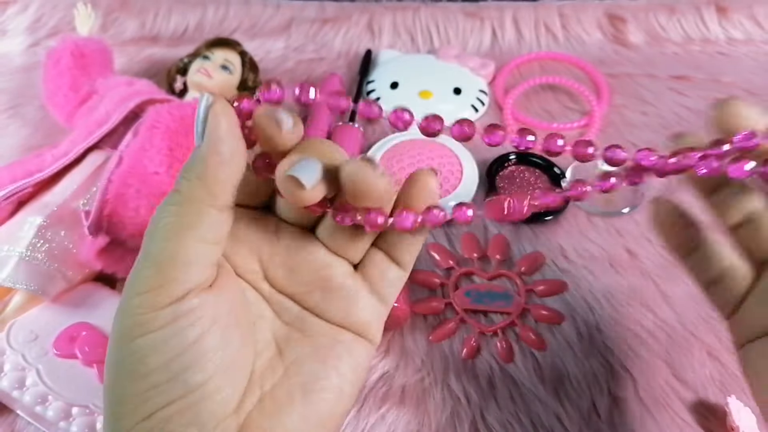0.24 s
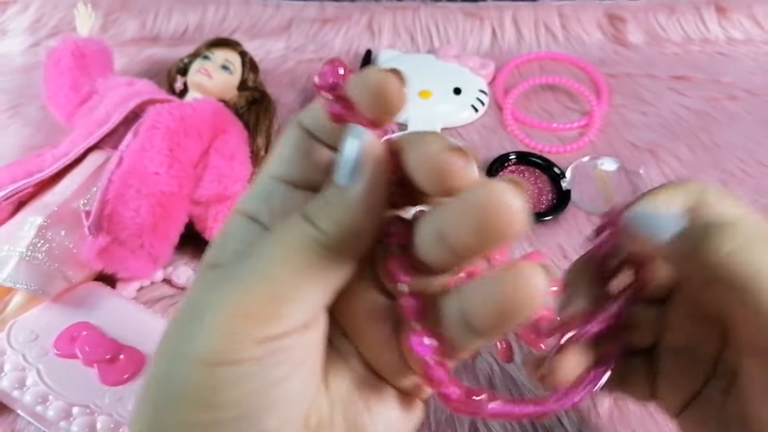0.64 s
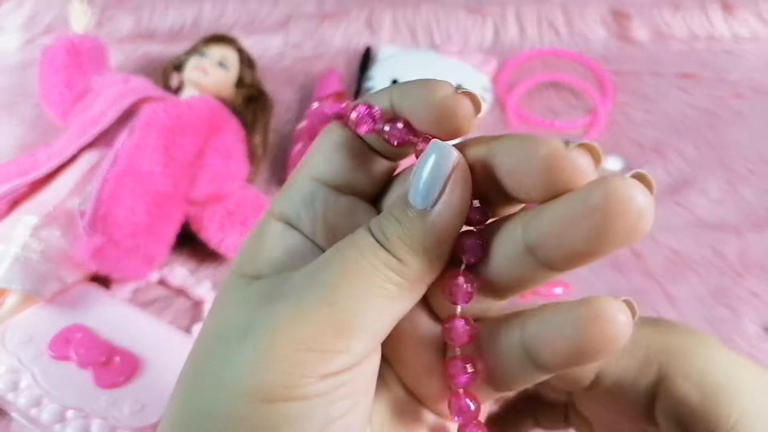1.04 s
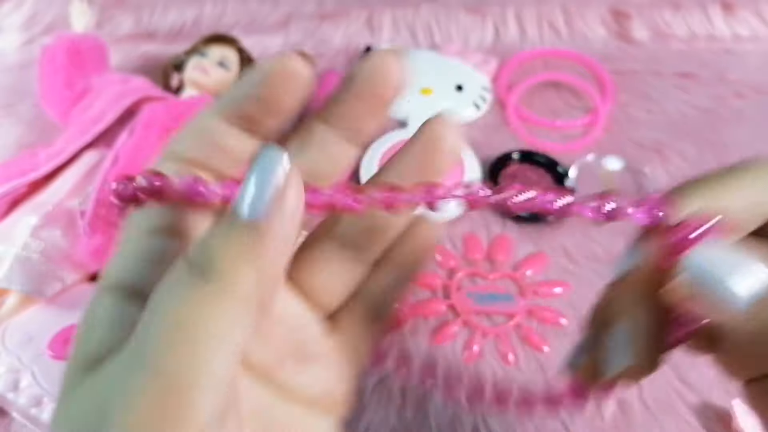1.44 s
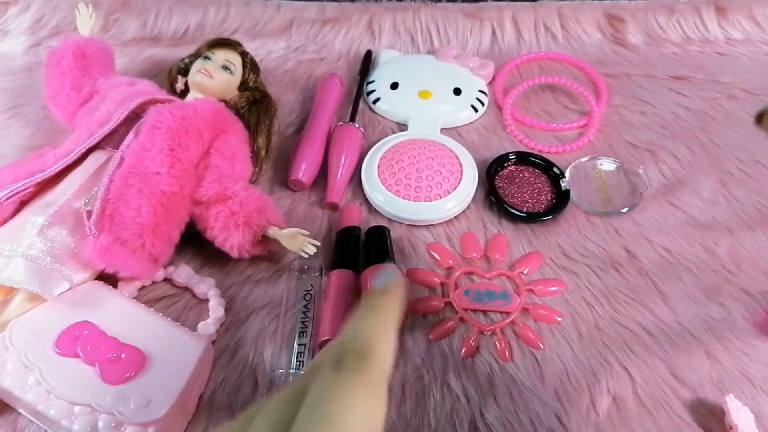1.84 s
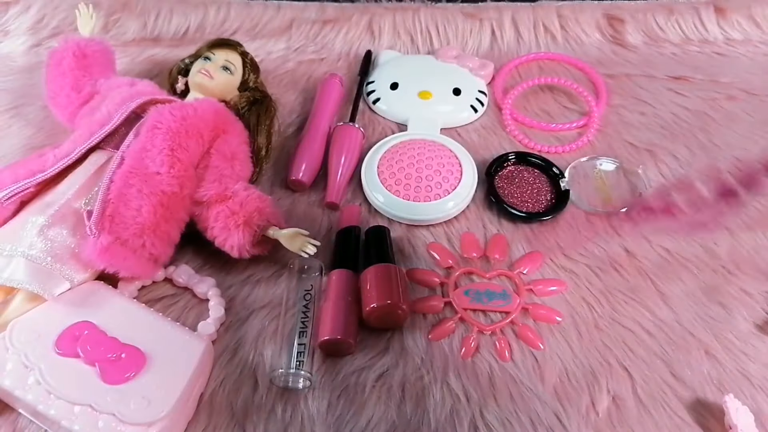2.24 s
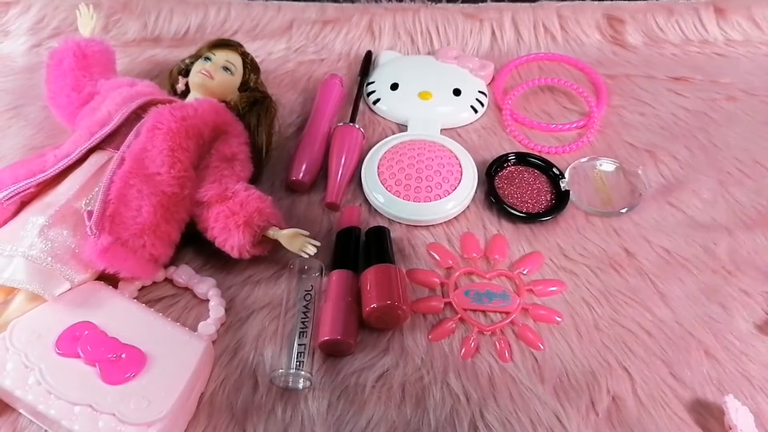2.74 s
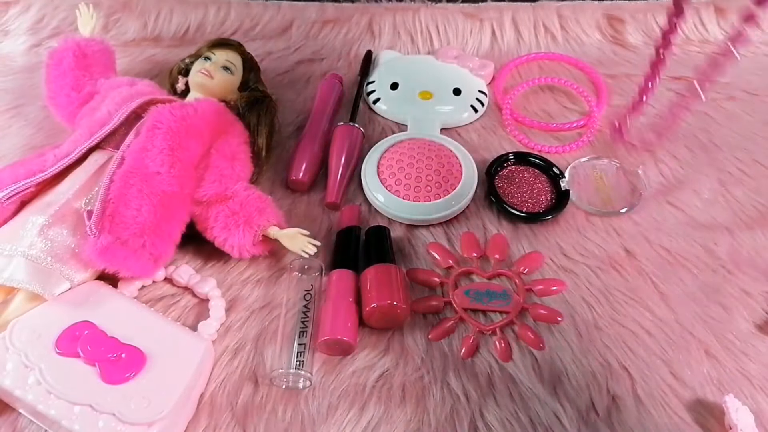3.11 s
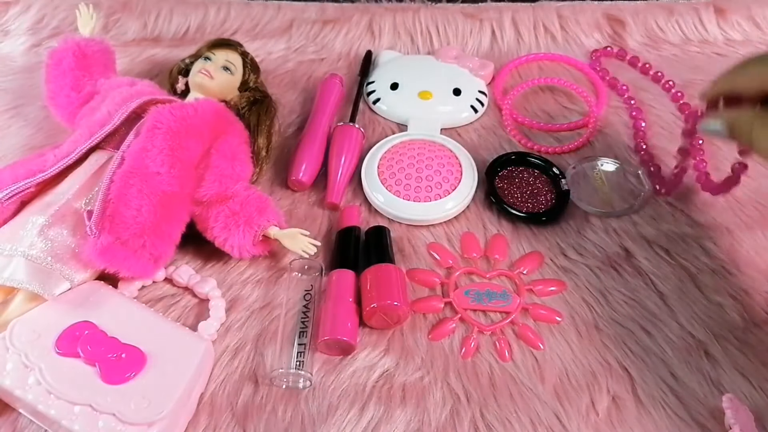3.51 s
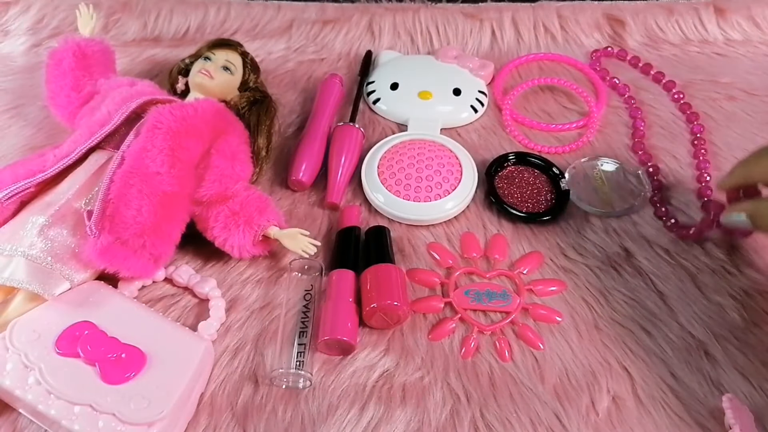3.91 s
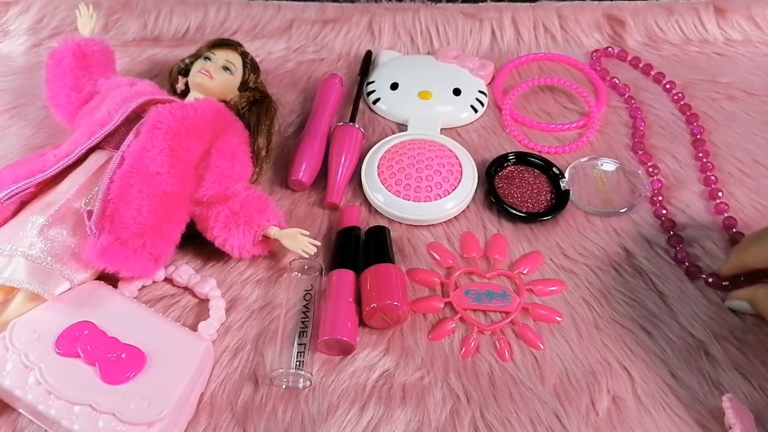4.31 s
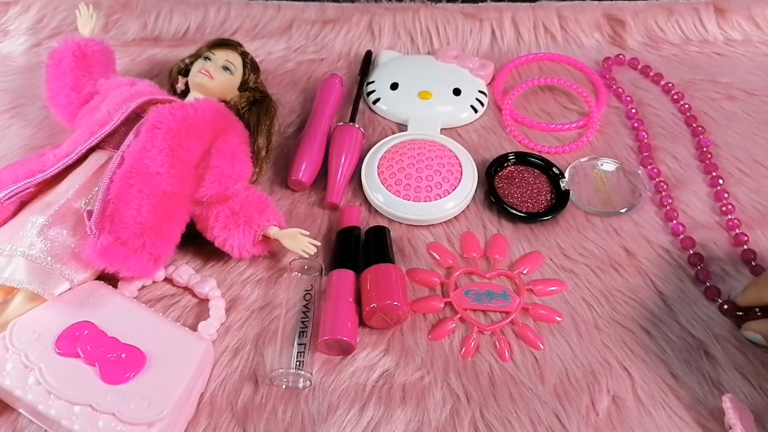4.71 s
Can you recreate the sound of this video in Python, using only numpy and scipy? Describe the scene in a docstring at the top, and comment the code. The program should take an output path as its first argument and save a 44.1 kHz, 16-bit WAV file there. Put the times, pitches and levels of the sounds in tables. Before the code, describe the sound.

Close, delicate handling of a plastic bead necklace over a fur rug. Crisp tiny clicks come in clusters, pause, and return as a rapid rattle on the right. A muffled puff and thud follow, then two short, bright, hollow clinks about half a second apart. Soft rubbing fades out at the end. Small soft-furnished room, short tail, uneven low motor hum and steady faint hiss.

```python
"""A string of hard plastic beads is turned in the hands near a two-port microphone, over a low hum and hiss.
First beads tick on each other as skin and fur rub, one knocks a dull toy, and a flurry of ticks follows.
Then soft drops land on a fur rug, a small hollow toy is struck twice, and rustle continues to the end.
Contacts are band-limited clicks, toys are sums of damped sines, and rubs, drops, hum and hiss are shaped noise.
A small room answers the ticks and toys with scatter, a few echoes and a short tail."""
import sys
import numpy as np
from scipy import signal
from scipy.fft import rfft, irfft
from scipy.io import wavfile

SR = 44100
rng = np.random.default_rng(int(sys.argv[2]) if len(sys.argv) > 2 else 0)


def put_to_file(sound):
    """Save the sound as 16-bit audio at rate SR, in the file named by the first command-line argument."""
    columns = np.atleast_2d(sound).T  # one column per channel
    safe = np.clip(columns, -1, 1)
    whole_steps = np.round(safe * 32767)
    wavfile.write(sys.argv[1], SR, whole_steps.astype(np.int16))


N = 218769


def amp(db):
    """Level law: an amplitude ratio is ten to the power of dB / 20."""
    return 10 ** (np.asarray(db) / 20)


def in_time(rows):
    """Linear interpolation: each column of a time curve is read at every sample."""
    s, *columns = np.transpose(rows)
    t = np.arange(N) / SR
    return [np.interp(t, s, column) for column in columns]


def band(x, low_hz, high_hz):
    """Band-pass filtering: gentle Butterworth slopes keep one range of frequency."""
    sos = signal.butter(2, [low_hz, min(high_hz, .45 * SR)], "band", fs=SR, output="sos")
    return signal.sosfilt(sos, x + 1e-18)


def train(seconds, db, pan_db, left_lag=0):
    """Interaural cues: clicks differ in level and arrival (lag in samples); rows are left, right, room feed."""
    clicks = np.zeros((3, N))
    at = np.round(np.asarray(seconds) * SR).astype(int)
    np.add.at(clicks[0], at + left_lag, amp(db + pan_db / 2))
    np.add.at(clicks[1], at, amp(db - pan_db / 2))
    np.add.at(clicks[2], at, amp(db))
    return clicks


def ring(clicks, hz, t60):
    """Damped resonance: a unit click starts a decaying sine of initial height 1."""
    r = amp(-60 / (t60 * SR))
    w = 2 * np.pi * hz / SR
    return signal.lfilter([0, np.sin(w)], [1, -2 * r * np.cos(w), r * r], clicks + 1e-18)


def strike(blow, modes):
    """Modal superposition: a blow excites every mode, neighbours starting in opposite sense."""
    total = 0
    for k, (hz, db, t60) in enumerate(modes):
        total = total + (-1) ** k * amp(db) * ring(blow, hz, t60)
    return total


def crack(clicks, low_hz, high_hz):
    """Impulse response: a unit click becomes a short band-limited pulse of height about 1."""
    pulse = band(band(clicks, low_hz, high_hz), low_hz, high_hz)
    return pulse * SR / (2 * (high_hz - low_hz))


# Left-right correlation of diffuse noise: f/Hz, likeness (1 = equal, 0 = unrelated)
LIKENESS_CURVE = [(60, 0.37), (180, 0.93), (550, 0.22), (1650, 0.0082), (4970, -0.13), (15000, -0.016)]


def noise(colour):
    """Spatial coherence: mid and side noise mix to a left-right likeness set by frequency; overall rms 1."""
    log_hz = np.log(np.arange(N // 2 + 1) * SR / N + 1)

    def at_bins(points):
        hz, value = np.transpose(points)
        return np.interp(log_hz, np.log(hz), value)

    mid, side = rfft(rng.standard_normal((2, N)))
    alike = np.clip(at_bins(LIKENESS_CURVE), -1, 1)
    pair = np.sqrt(1 + alike) * mid + np.sqrt(1 - alike) * side * [[1], [-1]]
    out = irfft(amp(at_bins(colour)) * pair, N)
    return out / out.std()


# Uneven level of the low random hum, before the small left-right offset: t/s, level/dB
HUM_LEVEL = [(0.0, -59.5), (0.5, -60), (0.9, -56.5), (1.73, -57), (2.33, -62), (2.9, -55), (3.35, -60.5),
             (4.05, -55.5), (4.96, -56.5)]
# Relative spectral density of the hum: f/Hz, level/dB per Hz
HUM_SPECTRUM = [(15, -39), (25, -1.5), (70, -9.5), (136, -7.5), (189, -11), (232, -1.5), (266, -8.5),
                (305, -4), (327, -20), (356, -11.5), (388, -20.5), (718, -16), (1080, -33), (1500, -41),
                (1950, -51), (3300, -120)]


def hum():
    """Amplitude modulation: low coloured noise follows an uneven level curve."""
    level_db, = in_time(HUM_LEVEL)
    return amp(level_db) * noise(HUM_SPECTRUM) * amp([[-.6], [.6]])


# Motor lines, level about which each wavers: f/Hz, level/dB rms
MOTOR_LINES = [(37, -70.5), (239, -69.5), (302, -72)]


def tones():
    """Line spectrum: steady motor pitches waver slowly in strength."""
    t = np.arange(N) / SR
    phases = rng.uniform(0, 2 * np.pi, (len(MOTOR_LINES), 2))
    total = 0
    for (hz, db), (phase, waver_phase) in zip(MOTOR_LINES, phases):
        waver_db = 6.1 * np.sin(6.23 * t + waver_phase)     # about once a second
        total = total + np.sqrt(2) * amp(db + waver_db) * np.sin(2 * np.pi * hz * t + phase)
    return total


# Relative spectral density of the hiss: f/Hz, level/dB per Hz
HISS_SPECTRUM = [(500, 1), (1200, -1), (3100, -5.5), (3950, -17), (5000, -9.5), (7100, -23.5),
                 (9000, -22.5), (12000, -16.5), (15200, -19.5), (15750, -20.5), (16000, -66)]


def hiss():
    """Stationary random noise: a constant, broad hiss lies under everything."""
    return amp(-68.5) * noise(HISS_SPECTRUM) * amp([[-.7], [.7]])


# How busily the fingers work the string, as level of the fine rustle: t/s, level/dB
HANDLING_LEVEL = [(0, -82.5), (.27, -85), (.7, -85), (1.0, -80.5), (1.35, -89), (1.7, -78), (2.3, -88.5),
                  (2.63, -81), (2.9, -85), (3.5, -85), (3.58, -81), (3.68, -91.5), (4.1, -82.5), (4.4, -81),
                  (4.96, -89)]
# Heavier rubs of skin and fur: t/s, length/s, middle layer level/dB, coarse layer level/dB
RUB_EVENTS = [(.225, .09, -67, -90), (0.452, 0.096, -61, -59), (0.538, 0.059, -70, -69),
              (1.444, 0.57, -83, -78), (2.603, 0.055, -69.5, -78), (2.655, 0.096, -67, -78),
              (3.548, 0.11, -88, -73), (4.044, 0.13, -70.5, -66), (4.158, 0.15, -77.5, -67.5),
              (4.254, 0.67, -86, -74), (4.744, 0.11, -79, -75)]


def rustle():
    """Friction noise: uneven grains form a fine layer that follows the handling, and rubs that swell fast."""
    t = np.arange(N) / SR
    rub_gains = np.zeros((2, 1, N))
    for s, length, *layer_db in RUB_EVENTS:
        part = np.clip((t - s) / length, 0, 1)
        rub_gains += amp(layer_db)[:, None, None] * np.sin(np.pi * part ** 0.5)
    sizes = amp(2.2 * rng.exponential(1, (2, N)))
    present = rng.random((2, N)) < 8000 / SR      # 8000 grains a second on average
    grains = rng.standard_normal((2, N)) * sizes * present
    fine, middle, coarse = band(grains, 4500, 9800), band(grains, 4530, 6050), band(grains, 660, 3800)
    gains = [amp(in_time(HANDLING_LEVEL)[0]), *rub_gains]
    total = sum(gain * layer / layer.std() for gain, layer in zip(gains, [fine, middle, coarse]))
    return total * amp([[-1.5], [1.5]])


# Hand jolts to the stand: t/s, nominal level/dB, upper band edge f/Hz
STAND_JOLTS = [(.456, -46.5, 750), (1.471, -54, 895), (1.476, -49, 910), (1.479, -36, 295),
               (2.735, -44, 72.4), (2.768, -47, 69)]


def bumps():
    """Structure-borne sound: a jolt through the stand is one low, round push on both ports."""
    out = np.zeros(N)
    for s, db, dull_hz in STAND_JOLTS:
        push = band(train([s], db, 0)[2], dull_hz / 3.5, dull_hz)
        out += push * SR / (2.5 * dull_hz)      # offsets the height lost in the band-pass
    return out * amp([[-1.5], [1.5]])


# Soft drops on the rug, before swell and clumping: t/s, puff level/dB, thud level/dB
RUG_DROPS = [(2.97, -47.5, -63), (2.9765, -37, -46), (3.0359, -42, -40.5)]
# Relative spectral density of the puff: f/Hz, level/dB per Hz
PUFF_SPECTRUM = [(60, -14), (130, -0.5), (300, -7), (900, 0), (1500, -15), (3000, -11), (6000, -19),
                 (7200, -19), (9000, -25), (11500, -28.5), (15000, -42), (15600, -46), (15900, -77.5)]
# Relative spectral density of the thud: f/Hz, level/dB per Hz
THUD_SPECTRUM = [(50, -27), (100, -10.5), (200, 7), (330, 1.5), (500, -35)]
LAND_RISE_S, LAND_T60_S = 0.0013, 0.058
# The rest of the weight sinks in a little later
SETTLE_AFTER_S, SETTLE_DB, SETTLE_RISE_S, SETTLE_T60_S = 0.0095, -2.5, 0.0047, 0.21


def drops():
    """Inelastic impact: pile crushed by many small contacts gives a puff of noise and a thud that die away."""
    t = np.arange(N) / SR

    def fade(s, rise, t60):
        since = np.maximum(t - s, 0)
        return amp(-60 * since / t60) * (1 - np.exp(-since / rise))

    puff, thud = 0, 0
    for s, db, thud_db in RUG_DROPS:
        landing = fade(s, LAND_RISE_S, LAND_T60_S)
        settling = amp(SETTLE_DB) * fade(s + SETTLE_AFTER_S, SETTLE_RISE_S, SETTLE_T60_S)
        puff = puff + amp(db) * (landing + settling)
        thud = thud + amp(thud_db) * (landing + settling)
    lumps = band(rng.standard_normal(N), 40, 420)      # the contacts come in clumps
    puff = puff * amp(1.6 * lumps / lumps.std())
    low_pass = signal.butter(12, 15300, fs=SR, output="sos")
    crush = signal.sosfilt(low_pass, puff * noise(PUFF_SPECTRUM))
    return (crush + thud * noise(THUD_SPECTRUM)) * amp([[-2.5], [2.5]])


# Rate at mean handling in 1/s; greatest level, sharpness and mean left minus right in dB
FAINT_PER_S, FAINT_DB, FAINT_SHARP_DB, FAINT_PAN_DB = 5.3, -64.5, -16, -13


def faint_ticks():
    """Random point process: small chance contacts are more frequent while the fingers are busy."""
    busy_db, = in_time(HANDLING_LEVEL)
    chance = rng.random((N // 441, 4))      # one try every hundredth of a second
    at = np.arange(len(chance)) * 441
    hit = chance[:, 0] < FAINT_PER_S / 100 * amp(busy_db[at] - busy_db.mean())
    s = (at + 400 * chance[:, 1]) / SR
    db = FAINT_DB - 8.0 * chance[:, 2]
    sharp_db = FAINT_SHARP_DB + 0 * at
    pan_db = FAINT_PAN_DB + 12.0 * (chance[:, 3] - .5)
    return np.c_[s, db, sharp_db, pan_db], hit


# Clear bead contacts: t/s, body band level/dB, sharpness (top band re body)/dB, left minus right/dB
BEAD_TICKS = [(0.126, -66, -5, -19), (0.159, -61, -24, -15), (0.2292, -37, 6.5, -3),
              (0.2347, -42.5, 7, -14), (0.2389, -46.5, 0, -18), (0.2544, -52, 13, -15),
              (0.2845, -48, 3, -21.5), (0.2887, -53, -1, -7), (0.2965, -58, -15, -16),
              (0.3681, -52.5, 0, -24), (0.4767, -43, -2, -24), (0.5055, -51, 1.5, -32),
              (0.5346, -51, 6, -19), (0.5661, -51, -2.5, -34), (1.0122, -52.5, -3, -12),
              (1.0989, -59.5, -10, -12), (1.1088, -63, -4, -23), (1.4678, -59, -14, -7),
              (1.511, -47.5, -28, 18.5), (1.5419, -49.5, -9, 14), (1.6591, -49.5, -20, -10),
              (1.6654, -57.5, -5, -32.5), (1.858, -54.5, -3, -16), (1.967, -60.5, -4, -24),
              (1.978, -32, -0.5, -18), (2.1746, -43, 10.5, -17), (2.202, -46, 2, -11),
              (2.2165, -49.5, 6, -24), (2.2246, -63, -4, -25), (2.238, -55, 1, -23), (2.2536, -46, 3, -25),
              (2.2772, -47, 2, -15), (2.291, -53, -7, -17), (2.313, -43, 0, -10), (2.3166, -44, -2, -18.5),
              (2.3214, -49, -1, -14), (2.334, -47, 0, -19), (2.339, -44.5, 7.5, -18), (2.3674, -52, 8, -8),
              (2.4213, -41, 6, -22), (2.4308, -51, 1, -27), (2.4343, -50, 5, -30), (2.4512, -58, 3, -22),
              (2.558, -59, -19, -7), (2.568, -56, -23, -10), (2.82, -49.5, -19, -20.5),
              (3.4485, -57, -8, -17), (3.5603, -45.5, -10, -15.5), (3.8199, -65.5, -8, -19)]
CHATTER_S, CHATTER_DB = 0.002, -3.5     # longest delay and greatest level of neighbours re first contact
LOW_BAND_DB, LOW_PER_SHARPNESS = -15, -0.9   # low band: dB re body, dB per dB of sharpness


def ticks():
    """Hertzian contact: tiny solid spheres hardly ring, so each touch is a very short click, weak in the lows."""
    faint, hit = faint_ticks()
    events = np.r_[BEAD_TICKS, faint]
    heard = np.repeat(np.r_[np.ones(len(BEAD_TICKS), bool), hit], 4)
    # the jolt runs along the string: three neighbours follow
    late = (rng.random((len(events), 4)) * [0, 1, 1, 1]).ravel()[heard]
    s, db, top_db, pan_db = np.repeat(events, 4, axis=0)[heard].T
    s = s + CHATTER_S * late
    db = db + (late > 0) * CHATTER_DB - 10.0 * late      # later neighbours are weaker
    low_db = np.minimum(LOW_BAND_DB + LOW_PER_SHARPNESS * top_db, -4.0)
    body = crack(train(s, db, pan_db, left_lag=4), 5400, 9200)
    top = crack(train(s, db + top_db, pan_db, left_lag=4), 8020, 15350)
    low = crack(train(s, db + low_db, pan_db, left_lag=4), 2730, 6000)
    return body + top + low


# Beads on the hollow toy: t/s, blow level/dB, cavity f/Hz, left minus right/dB, bright mode gain/dB
HOLLOW_HITS = [(3.2688, -21.5, 4990, -10.5, -24), (3.6522, -22.5, 4810, -7, -39)]
# Shell modes of the hollow toy: f/Hz, level/dB, T60/s
HOLLOW_MODES = [(1440, -19, 0.013), (2800, -17, 0.046), (3280, -12, 0.0095), (3350, -12, 0.016),
                (4450, -40, 0.0096), (6700, -35, 0.0024), (7460, -21.5, 0.0022), (8100, -5, 0.035),
                (8220, -10, 0.014)]
# Modes reached by a sharp blow only, before the gain of each hit: f/Hz, level/dB, T60/s
SHARP_MODES = [(9200, 8, 0.011), (10030, 0, .01), (12500, 10.5, 0.0031), (15000, -14, .004)]
# Bead on the duller toy: t/s, blow level/dB, left minus right/dB
DULL_HITS = [(1.2600, -31.5, -5)]
# Modes of the duller toy: f/Hz, level/dB, T60/s
DULL_MODES = [(1700, -11, 0.0065), (2010, -2.5, 0.026), (2280, -4.5, 0.0083), (3170, -9, 0.0038),
              (4550, -9.5, 0.0089), (4980, -7.5, 0.005), (6870, -9, 0.0055), (8280, -5.5, 0.0073),
              (12200, -29, 0.0026)]
CAVITY_DB, CAVITY_T60_S = -0.5, 0.018
TWIN_RATIO, TWIN_DB = 1.008, -13   # the cavity is not quite round: a second, close pitch
ECHO_S, ECHO_DB = .0075, -12.5   # a near surface returns the clink about 7.5 ms later


def toys():
    """Modal radiation: struck small shells and an air cavity ring, but radiate no bass."""
    hollow = 0
    for s, db, cavity_hz, pan_db, bright_db in HOLLOW_HITS:
        blow = train([s, s + ECHO_S], db + np.array([0, ECHO_DB]), pan_db, left_lag=-5)
        main = ring(blow, cavity_hz, CAVITY_T60_S)
        twin = amp(TWIN_DB) * ring(blow, cavity_hz * TWIN_RATIO, CAVITY_T60_S)
        cavity = amp(CAVITY_DB) * (main + twin) * amp([[-5], [0], [-4]])    # it opens to the right
        body = band(strike(blow, HOLLOW_MODES) + cavity, 1950, 12200)
        bright = amp(bright_db) * band(strike(blow, SHARP_MODES), 7200, 17000)
        hollow = hollow + body + bright
    s, db, pan_db = np.transpose(DULL_HITS)
    dull = strike(train(s, db, pan_db, left_lag=-7), DULL_MODES)
    dull = band(band(dull, 1100, 16000), 1100, 16000)
    return band(hollow, 2000, 16000) + dull


# Floor, wall and far wall, before absorption: delay t/s, left level/dB, right level/dB
WALL_ECHOES = [(.0020, -9, -22), (.0078, -28, -13.5), (.0175, -37, -10.5)]
NEARBY_DB, NEARBY_T60_S = -24, 0.032
# OUTER_T60_S: decay of the tail below 3.7 and above 7.9 kHz; ROOM_T60_S: between them
ROOM_DB, ROOM_T60_S, OUTER_T60_S, ROOM_FILL_S = -28, 0.23, 0.2, .018


def room(x):
    """Reverberation: nearby scatter, wall echoes, then a slowly filling diffuse tail with two decay rates."""
    t = np.arange(SR // 3) / SR
    nearby, diffuse = rng.standard_normal((2, 2, len(t)))
    reply = nearby * amp(NEARBY_DB - 60 * t / NEARBY_T60_S) * (t > .0006)
    lasting = band(diffuse, 3700, 7900)
    tail = lasting * amp(-60 * t / ROOM_T60_S) + (diffuse - lasting) * amp(-60 * t / OUTER_T60_S)
    reply += amp(ROOM_DB) * tail * (1 - np.exp(-t / ROOM_FILL_S))
    for delay, *side_db in WALL_ECHOES:
        reply[:, round(delay * SR)] += amp(side_db)
    reply = signal.sosfilt(signal.butter(8, 15500, fs=SR, output="sos"), reply)
    reply = reply - .55 * band(reply, 1200, 3300)      # rug and cloth swallow the mids
    return signal.fftconvolve(x[None], reply, axes=1)[:, :N]


def scene():
    """Linear superposition: background, soft contacts, and hits with their room add up."""
    hits = ticks() + toys()
    background = hum() + tones() + hiss()
    soft_contacts = rustle() + bumps() + drops()
    return background + soft_contacts + hits[:2] + room(hits[2])


# Microphone port resonances: f/Hz, width/Hz, peak gain/dB
PORT_RESONANCES = [(7206, 565, 14), (15150, 1400, 6)]


def record(dry):
    """Port resonance: two treble bands are lifted, and a steep low-pass cuts the top."""
    for hz, width_hz, db in PORT_RESONANCES:
        r = np.exp(-np.pi * width_hz / SR)
        poles = [1, -2 * r * np.cos(2 * np.pi * hz / SR), r * r]
        peak = signal.lfilter([(1 - r * r) / 2, 0, (r * r - 1) / 2], poles, dry)
        dry = dry + (amp(db) - 1) * peak
    return signal.sosfilt(signal.ellip(10, 1, 70, 16600, fs=SR, output="sos"), dry)


dry = scene()
out = record(dry)
put_to_file(out)
```